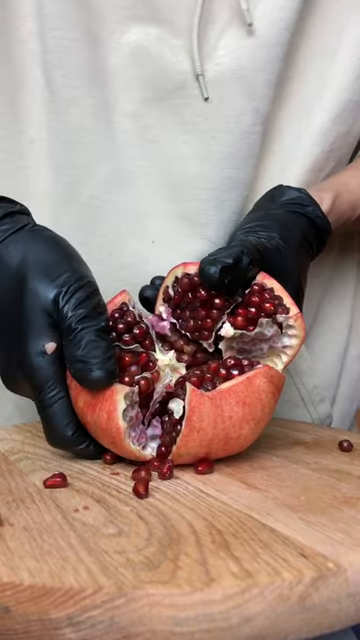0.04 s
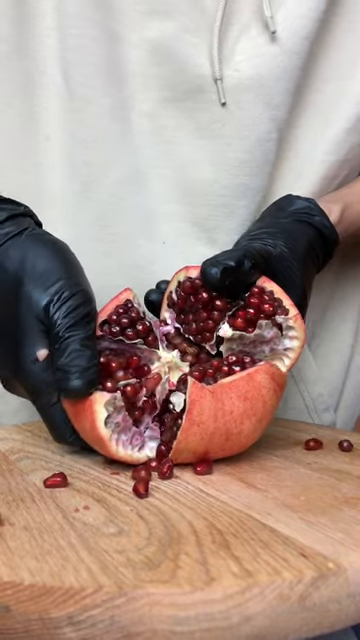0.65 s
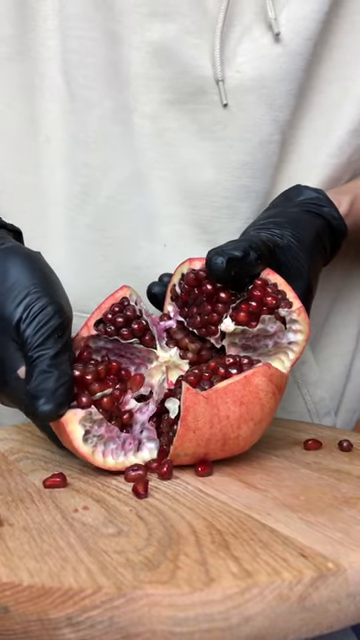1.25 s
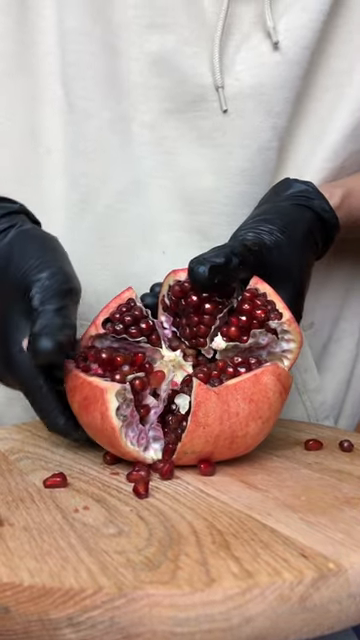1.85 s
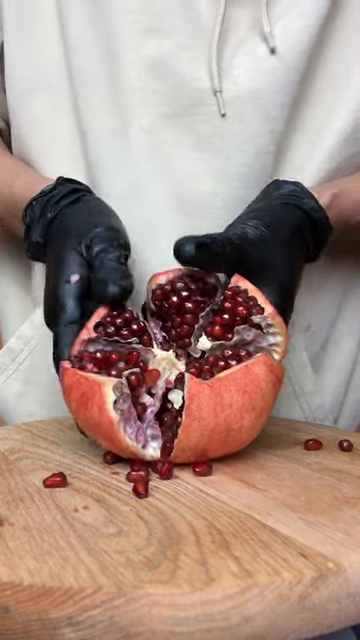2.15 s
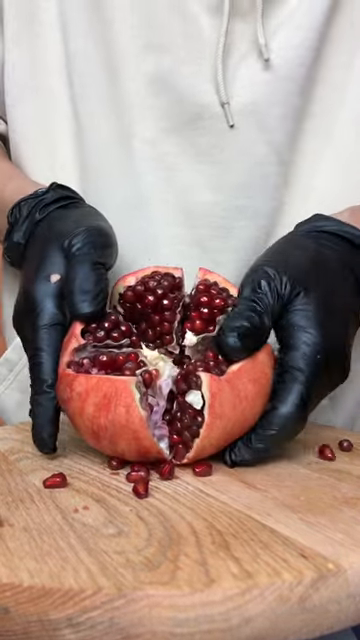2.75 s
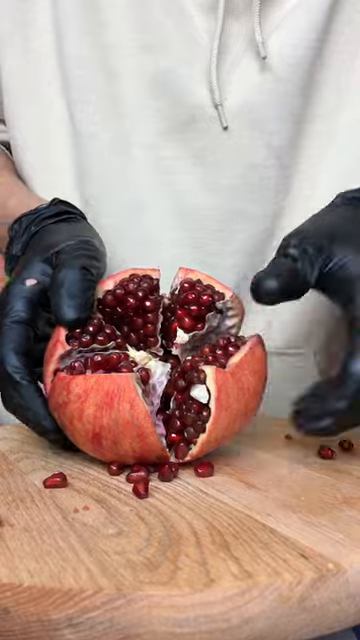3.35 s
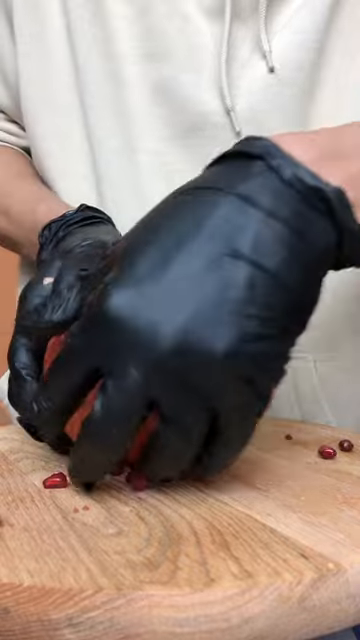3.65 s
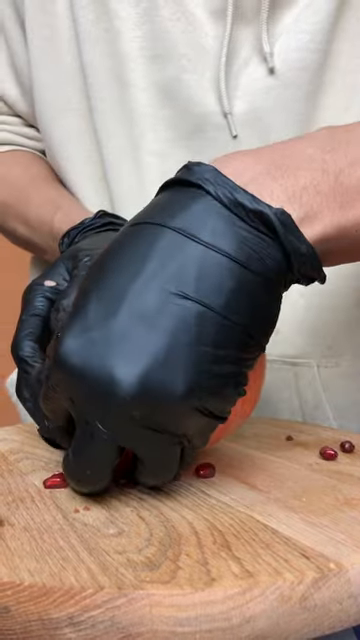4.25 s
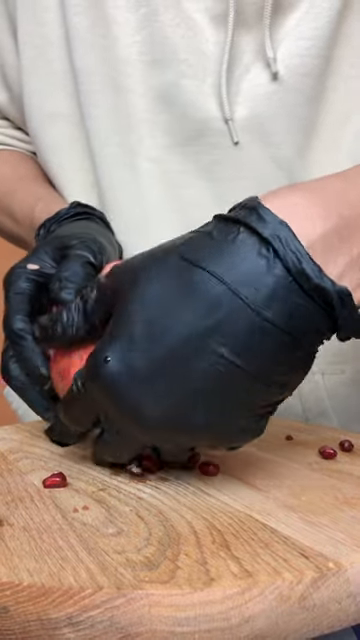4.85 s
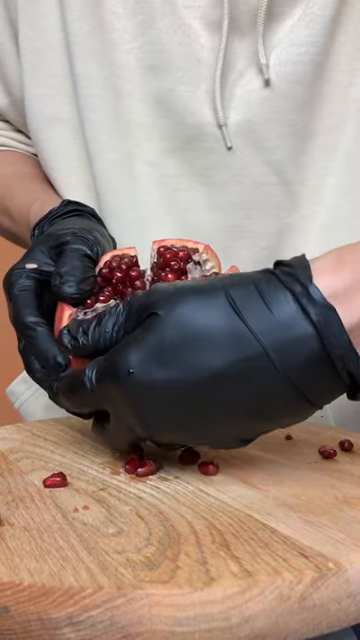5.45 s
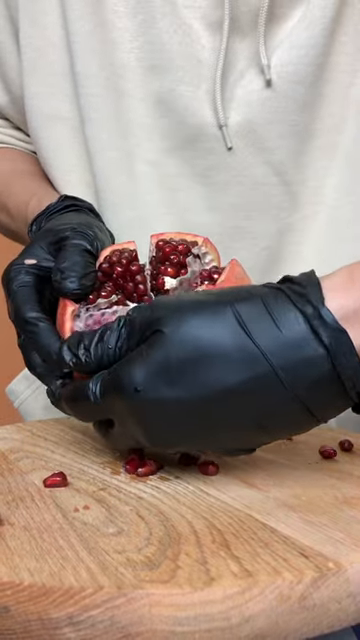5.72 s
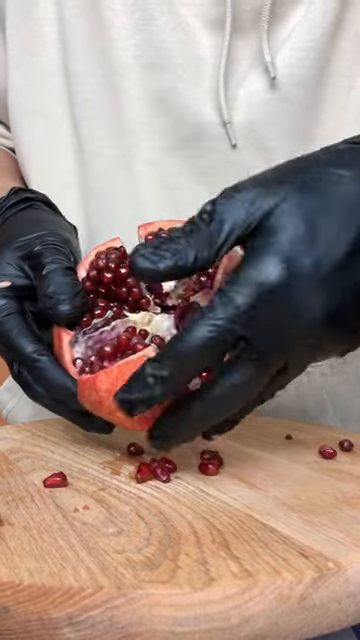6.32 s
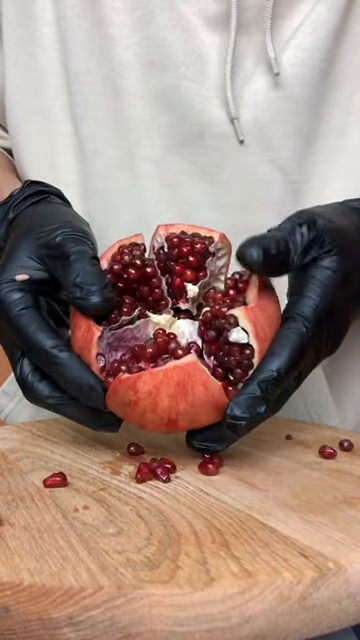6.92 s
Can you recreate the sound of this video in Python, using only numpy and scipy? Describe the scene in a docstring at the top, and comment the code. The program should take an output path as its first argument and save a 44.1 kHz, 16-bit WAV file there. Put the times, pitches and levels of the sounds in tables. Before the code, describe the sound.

Gloved hands pull a pomegranate apart on a wooden board, close to the microphone. A few small snaps and seed taps lead into one loud burst of cracking rind, followed by faint wet crackles. Rubber gloves rub and squeak on the skin, a second, softer stretch of tearing crackles through the pith, and the gloves rasp and squeak again. A small room hums quietly behind.

```python
"""Pulling a pomegranate open

Close up, gloved hands pull a scored pomegranate apart on a wooden board. The rind gives way in one
loud burst of snaps, pith and wet seeds crackle, and loose seeds tap the board. The rubber gloves
stick and slip on the skin, rubbing, rasping and squeaking. Behind it a small room hums and rumbles."""
import sys
import numpy as np
from scipy import signal
from scipy.fft import rfft, irfft
from scipy.io import wavfile

SR = 44100
rng = np.random.default_rng(int(sys.argv[2]) if len(sys.argv) > 2 else 0)


def output_pcm(signal):
    """Save a mono or channel-first signal as 16-bit PCM at the path in sys.argv[1].

    Samples are clipped to [-1, 1] before scaling.
    """
    pcm = np.clip(np.atleast_2d(signal).T, -1, 1) * 32767
    wavfile.write(sys.argv[1], SR, np.round(pcm).astype(np.int16))


N = 312228
TIME = np.arange(N) / SR

# tone colour of wet pith: (frequency [Hz], level [dB])
PITH_SPECTRUM = [(300, -24), (700, -6.5), (1150, -7.5), (1500, 1), (2000, -4.5), (2500, -0.5), (3800, -9),
                 (5000, -7.5), (7300, -7.5), (9300, -10), (10700, -13.5), (13500, -11), (16000, -28)]
# loose seeds landing on the board: (time [s], level [dB], ring pitch [Hz])
SEED_DROPS = [(0.212, -22, 990), (0.247, -10, 1100), (0.349, -21.5, 915), (0.413, -18.5, 1560),
              (1.494, -21, 680), (1.577, -33, 714)]


def from_db(db):
    """Decibels to gain."""
    return 10 ** (np.asarray(db) / 20)


def rms_one(x):
    """Scale to unit rms."""
    return x / np.sqrt(np.mean(x ** 2) + 1e-20)


def in_time(rows):
    """Each column of an automation curve at every sample."""
    s, *columns = np.transpose(rows)
    return [np.interp(TIME, s, c) for c in columns]


def at_hz(points, hz):
    """Read a table on a log-frequency axis."""
    f, value = np.transpose(points)
    return np.interp(np.log(np.maximum(hz, 1)), np.log(f), value)


def cut(x, hz, kind, order=2):
    """Butterworth filter."""
    sos = signal.butter(order, np.clip(hz, 5, .48 * SR), kind, fs=SR, output="sos")
    return signal.sosfilt(sos, x + 1e-18)


def coloured(x, spectrum):
    """Shape a signal with an EQ curve; rms 1."""
    gains = from_db(at_hz(spectrum, np.arange(N // 2 + 1) * SR / N))
    return rms_one(irfft(rfft(x) * gains, N))


def drift(per_s):
    """Random modulation gliding to per_s new values a second; rms 1."""
    knots = rng.standard_normal(int(N / SR * 2000))
    return rms_one(np.interp(TIME * per_s, np.arange(len(knots)), knots))


def ring(x, hz, t60):
    """A resonator: a unit click starts a sine of height 1 that falls 60 dB in t60 seconds."""
    r = from_db(-60 / (max(t60, 1e-4) * SR))
    w = 2 * np.pi * min(hz, .45 * SR) / SR
    return signal.lfilter([0, np.sin(w)], [1, -2 * r * np.cos(w), r * r], x + 1e-18)


def grains(per_s, spread_db, cycles):
    """Tiny ruptures of uneven size, each ringing a few cycles at one of 16 pitches; rms 1."""
    sizes = from_db(spread_db * np.minimum(rng.exponential(1, N), 4)) * rng.choice([-1, 1], N)
    clicks = sizes * (rng.random(N) < per_s / SR)
    pitches = np.geomspace(700, 15000, 16)
    dealt = rng.integers(0, len(pitches), N)
    return rms_one(sum(ring(clicks * (dealt == k), hz, cycles / hz) * hz for k, hz in enumerate(pitches)))


def gate(start, length, attack_s, release_s):
    """Envelope that is fully open at start, holds, then dies away."""
    attack = np.clip((TIME - start) / attack_s + 1, 0, 1)
    return attack * np.exp(-np.clip((TIME - start - length) / release_s, 0, 30))


def stroked(texture, strokes, shape, body_hz, sheen_hz):
    """Play the body, middle and sheen of a texture along each stroke of the hands."""
    bands = (cut(texture, body_hz, "low", order=4),
             cut(texture, [body_hz, sheen_hz], "band", order=4),
             cut(texture, sheen_hz, "high", order=4))
    rows = np.array(strokes)
    envelopes = np.array([shape(*timing) for timing in rows[:, :-len(bands)]])
    powers = from_db(rows[:, -len(bands):]).T ** 2 @ envelopes ** 2
    return sum(rms_one(band) * np.sqrt(power) for band, power in zip(bands, powers))


def hum(curve, hz, gain_db, waver_hz, flutter_db, third=0):
    """A tone that wavers in pitch and level, with an optional third harmonic."""
    phase = 2 * np.pi * np.cumsum(hz + waver_hz * drift(15)) / SR
    level = from_db(in_time(curve)[0] + gain_db + flutter_db * drift(9))
    return np.sqrt(2) * level * (np.sin(phase) + third * np.sin(3 * phase))


def room_tone():
    """Two wavering hums over a dull, resonant rumble and a faint hiss."""
    # tone colours: (frequency [Hz], level [dB])
    air_spectrum = [(300, 16), (600, 12.5), (1100, 9.5), (1500, 6), (2500, 13.5), (3200, 3), (8000, 7),
                    (10500, -42), (14000, -30), (16000, -6)]
    rumble_spectrum = [(30, -2.5), (58, 3), (74, -16), (93, 7.5), (135, -0.5), (185, 2), (240, -5.5),
                       (340, -17.5), (440, -16), (600, -17.5), (1000, -27)]
    # fader moves: (time [s], level [dB])
    low_hum_fader = [(0.0, -33.5), (0.37, -26.5), (0.67, -29.5), (0.69, -40), (1.1, -37), (1.3, -27.5),
                     (1.58, -25.5), (1.77, -41.5), (1.81, -33.5), (2.33, -24.5), (2.8, -32.5),
                     (3.06, -24.5), (3.19, -34.5), (4.0, -31), (4.08, -50), (4.14, -38.5), (4.77, -32.5),
                     (5.68, -43), (6.98, -47.5), (7.08, -65)]
    upper_hum_fader = [(0.0, -66), (0.69, -49.5), (3.63, -38), (3.69, -46.5), (5.21, -46.5), (5.24, -38.5),
                       (5.86, -49.5), (6.17, -32), (7.08, -36.5)]
    rumble_fader = [(0.0, -43.5), (1.3, -43), (3.2, -37), (3.6, -40), (5.6, -46), (7.08, -44.5)]
    # resonances standing out of the rumble: (frequency [Hz], level [dB], t60 [s])
    room_modes = [(88, -21, 0.23), (179, -8.5, 0.33), (195.8, -7, 1), (225.2, -8, 0.49), (288.2, -14, 0.12),
                  (340.7, -15.5, 0.41)]
    hiss = from_db(-50) * coloured(rng.standard_normal(N), air_spectrum)
    low_hum = hum(low_hum_fader, hz=113.5, gain_db=-0.6, waver_hz=0.81, flutter_db=1.77)
    upper_hum = hum(upper_hum_fader, hz=160.5, gain_db=-0.4, waver_hz=1.73, flutter_db=1.6,
                    third=from_db(-27))
    white = rng.standard_normal((2, N))
    boom = sum(from_db(db) * rms_one(ring(white[0], hz, t60)) for hz, db, t60 in room_modes)
    rumble = from_db(3.0) * coloured(white[1], rumble_spectrum) + from_db(1.5) * boom
    return hiss + low_hum + upper_hum + from_db(in_time(rumble_fader)[0]) * rumble


def table_sway():
    """The table shakes slowly under the hands: a sub-bass wobble."""
    # weight of the wobble: (frequency [Hz], level [dB])
    sway_spectrum = [(8, -12), (14, 0), (22, -6), (32, -14), (45, -24), (80, -50), (200, -100)]
    # how hard the table shakes: (time [s], level [dB])
    shake = [(0.0, -23.5), (0.45, -34.5), (0.67, -22), (1.05, -39), (1.54, -29.5), (2.0, -29), (2.15, -41),
             (3.3, -30.5), (4.14, -44), (4.6, -25), (4.95, -27), (5.3, -41), (7.08, -56)]
    return coloured(rng.standard_normal(N), sway_spectrum) * from_db(in_time(shake)[0])


def tear_shape(start, length, sag_db=2.5):
    """A tear is strongest as it gives way, then slackens."""
    tension = np.interp(TIME, [start, start + length], [1, from_db(-sag_db)])
    return gate(start, length, attack_s=0.002, release_s=0.015) * tension


def pith():
    """Cell walls burst in clumps over a fine wet fizz; now and then a thicker one ticks."""
    # pulls that tear pith and squash seeds:
    # (start [s], length [s], wet body [dB], crackle [dB], sheen [dB])
    tears = [(0.005, 0.078, -36.5, -45, -41), (0.494, 0.0083, -34, -31, -40),
             (0.5495, 0.012, -11, -12.5, -22), (0.565, .04, -25, -30, -34), (0.612, 0.035, -27, -28, -30),
             (0.673, 0.048, -33, -35.5, -56), (0.876, 0.19, -49, -58, -49), (1.14, 0.055, -41, -41, -38),
             (1.215, 0.075, -44, -44, -44), (1.308, 0.075, -39.5, -38, -39), (1.438, 0.02, -40, -41, -44),
             (1.792, 0.078, -42.5, -43.5, -47), (4.037, 0.39, -38.5, -40.5, -47),
             (4.175, 0.042, -30, -30.5, -36), (4.241, 0.12, -31.5, -29.5, -38),
             (4.37, 0.06, -33.5, -30, -36.5), (4.452, 0.024, -39, -26, -35), (4.493, 0.12, -43.5, -33, -40),
             (4.62, 0.36, -47, -43.5, -47), (5.173, 0.05, -41, -39, -43.5), (5.244, 0.06, -49, -46, -49),
             (5.367, 0.0071, -50, -42, -41), (5.422, 0.013, -37.5, -38.5, -40.5)]
    crackle = grains(per_s=2800, spread_db=1.0, cycles=8.2)
    fizz = from_db(-2.5) * rng.standard_normal(N)
    clumps = coloured(crackle + fizz, PITH_SPECTRUM) * from_db(1.9 * drift(130))
    ticks = coloured(rng.standard_normal(N) * (rng.random(N) < 110 / SR), PITH_SPECTRUM)
    texture = clumps + from_db(-14.5) * ticks
    return from_db(-3.5) * stroked(texture, tears, tear_shape, body_hz=3460, sheen_hz=8440)


def juice(ticks_per_s=32):
    """Sticky seeds and small fibres tick faintly while the fruit is being spread."""
    # the hands spread the fruit: (start [s], end [s])
    spreads = [(0, 1.9), (3.5, 5.35)]
    spreading = sum((TIME > start) & (TIME < end) for start, end in spreads)
    sizes = from_db(2.9 * np.minimum(rng.exponential(1, N), 3)) * rng.choice([-1, 1], N)
    ticks = sizes * (rng.random(N) < ticks_per_s / SR)
    return from_db(-50.5) * spreading * coloured(ticks, PITH_SPECTRUM)


def fractures(events, edge_s, edge_hz, crumble_db, crumble_s):
    """Each fracture is a sharp edge and a damped ring of the broken piece, trailed by fine crumbling."""
    out, t = np.zeros(N + SR), np.arange(SR // 25) / SR
    for s, db, hz, edge_db, cycles in events:
        tear, crumbs = rng.standard_normal((2, len(t)))
        body = ring(1. * (t == 0), hz, cycles / hz)
        edge = cut(tear * np.exp(-t / edge_s), edge_hz, "high")
        edge = cut(edge, 7600, "low", order=1)
        snap = cut(body + from_db(edge_db) * edge / np.abs(edge).max(), hz * 0.37, "high")
        # hands, peel and board scatter a weak copy of the snap
        scatter = crumbs * np.abs(crumbs) * np.exp(-t / crumble_s) * (t > 1 / 1000)
        crumble = signal.fftconvolve(snap, scatter / np.linalg.norm(scatter))[:len(t)]
        snap = snap + from_db(crumble_db) * crumble
        at = int(s * SR)
        out[at:at + len(t)] += from_db(db) * snap / np.abs(snap).max()
    return out[:N]


def hollow(x, hz, width_hz, depth):
    """Scoop a dip out of the spectrum; depth 1 is a full notch."""
    notched = signal.lfilter(*signal.iirnotch(hz, hz / width_hz, fs=SR), x + 1e-18)
    return x + depth * (notched - x)


def rind_and_seeds():
    """The big break, lone snaps and dropping seeds, hollowed by their reflection from the board."""
    # the rind breaks through: (time [s], level [dB], ring pitch [Hz], edge [dB], ring length [cycles])
    rind_break = [(0.498, -2.5, 1520, -8, 5.6), (0.5478, 8, 1400, 7, 7.8), (0.5497, 1.5, 1004, -16, 11),
                  (0.5553, 10.5, 1590, -27, 9.8), (0.566, -2, 1820, 17, 8), (0.5757, -8, 2400, -13, 12),
                  (0.5853, -2, 1350, 22, 4.6), (0.599, 4, 1500, 23, 9.6), (0.6018, 9, 7000, -17, 11),
                  (0.6084, 6.5, 3930, 10, 8), (0.6123, 8.5, 1660, 1, 8.8), (0.6158, 9, 2660, 15, 11),
                  (0.6403, -2, 1490, 2, 5.1), (0.6528, 10.5, 2530, -1.5, 7.4)]
    # single fibres snap: (time [s], level [dB], ring pitch [Hz])
    fibre_snaps = [(0.017, -13, 1490), (0.065, -2, 2200), (0.12, -3, 2700), (0.313, 0, 11700),
                   (0.46, -11.5, 5600), (0.467, -8.5, 6300), (0.834, -21.5, 2320), (0.877, -12, 3480),
                   (0.882, -12, 2560), (0.908, -11.5, 7100), (0.938, -11.5, 3830), (0.966, -15, 2620),
                   (1.04, -17, 1420), (1.059, -13.5, 2500), (1.137, -16.5, 1420), (1.151, -5.5, 4660),
                   (1.211, -12, 7600), (1.341, -7.5, 2240), (1.42, -6.5, 1410), (1.474, -5.5, 5450),
                   (1.851, -19.5, 950), (1.883, -16, 2540), (2.019, -23, 950), (2.031, -14, 3930),
                   (2.189, -18, 5970), (2.261, -15, 1970), (2.361, -6, 10100), (2.847, -12, 1710),
                   (2.897, -15.5, 1770), (2.946, -8, 2600), (3.02, -12, 6650), (3.03, -7.5, 2750),
                   (3.711, -18.5, 5940), (3.755, -16, 3720), (4.038, -11, 2550), (4.178, -11, 2630),
                   (4.19, -2, 5940), (4.236, -3.5, 6650), (4.254, -4, 6340), (4.264, -0.5, 5570),
                   (4.314, 1.5, 4220), (4.325, -9.5, 1550), (4.384, -14, 4260), (4.46, -7, 4850),
                   (4.654, -14, 7370), (5.014, -14, 2900), (5.119, -16, 2500), (5.178, -12, 4570),
                   (5.22, -14, 1620), (5.289, -16, 2310), (5.419, -25, 1630), (5.608, -18.5, 1480),
                   (5.632, -14, 2760), (5.724, -9.5, 2690), (5.775, -27, 2600), (5.823, -17.5, 1940),
                   (6.308, -13.5, 1680), (6.826, -22, 1490)]
    fibre_cycles, seed_cycles, seed_edge_db = 9.7, 3, -5.5
    burst = fractures(rind_break, edge_s=0.00081, edge_hz=1750, crumble_db=-15.5, crumble_s=0.005)
    # thick fibres tear with a sharp edge, thin ones just ping: 9.5 dB less edge per octave above 2500 Hz
    fibres = [(s, db, hz, 6 - 9.5 * max(np.log2(hz / 2500), 0), fibre_cycles)
              for s, db, hz in fibre_snaps]
    seeds = [(s, db, hz, seed_edge_db, seed_cycles) for s, db, hz in SEED_DROPS]
    lone = fractures(fibres + seeds, edge_s=0.00036, edge_hz=3400, crumble_db=-9.0, crumble_s=0.0032)
    snaps = from_db(-0.5) * (burst + lone)
    snaps = hollow(snaps, hz=5080, width_hz=1950, depth=0.35)
    return hollow(snaps, hz=10700, width_hz=6300, depth=0.66)


def knocked_wood(hits):
    """The board rings in all its modes after each knock."""
    # resonances of board and table: (frequency [Hz], level [dB], t60 [s])
    wood_modes = [(24.7, -6, 0.68), (89.7, 0.5, 0.5), (104, -39, 0.17), (297, -26, 0.036), (520, -11, 0.1),
                  (818, 3, 0.04), (949, -8.5, 0.2)]
    knocks = np.zeros(N)
    for s, db, *_ in hits:
        knocks[int(s * SR)] = from_db(db)
    return sum(from_db(db) * ring(knocks, hz, t60) for hz, db, t60 in wood_modes)


def board():
    """The fruit jolts the board; light seeds wake only its upper modes."""
    # jolts as rind and core let go: (time [s], level [dB])
    thumps = [(0.549, -18), (0.612, -17), (4.191, -33.5), (4.27, -33.5)]
    taps = from_db(-19) * cut(knocked_wood(SEED_DROPS), 840, "high", order=4)
    return knocked_wood(thumps) + taps


def rub_shape(start, length, crest, swell_db=3.5):
    """A stroke presses harder up to its crest, then eases."""
    ends = from_db(-swell_db)
    pressure = np.interp(TIME, start + length * np.array([0, crest, 1]), [ends, 1, ends])
    return gate(start, length, attack_s=0.011, release_s=0.0077) * pressure


def glove_rubs():
    """Rubber sticks and slips very fast on the skin of the fruit."""
    # strokes: (start [s], length [s], crest [share of length], body [dB], hiss [dB], sheen [dB])
    rubs = [(2.191, 0.018, .3, -55, -37, -43), (2.242, 0.11, 1, -43.5, -43, -45),
            (2.374, 0.2, 0.78, -42, -35, -39), (2.412, 0.069, 0.21, -47, -29, -27.5),
            (2.669, 0.085, .25, -40.5, -32, -37), (2.767, 0.067, 0.34, -40, -38.5, -46),
            (2.84, 0.4, 0.31, -46, -43, -49), (3.183, 0.15, 0.72, -41.5, -34, -39),
            (3.332, 0.15, .1, -53, -48, -46), (3.535, 0.023, .5, -56, -43, -56),
            (3.602, 0.056, 0.7, -46.5, -41, -45), (3.714, 0.074, 0.65, -49, -41, -49),
            (3.819, .1, 1, -52, -41, -46), (4.8, 0.223, 0.48, -42.5, -31, -39.5),
            (4.908, 0.056, .4, -51, -27.5, -29.5), (5.057, 0.026, 0.44, -50, -38, -36),
            (5.931, 0.17, 0.98, -49, -42, -48), (6.115, 0.018, 0.12, -33, -26, -33),
            (6.141, 0.073, 1, -41, -29.5, -33.5), (6.223, 0.594, .4, -47.5, -43.5, -46),
            (6.85, 0.1, 0.86, -54.5, -47, -51), (6.393, 0.078, .6, -47, -38.5, -46),
            (6.706, .09, 0.59, -51, -40.5, -58)]
    # tone colour of sliding rubber: (frequency [Hz], level [dB])
    rubber_spectrum = [(400, -4), (1100, -1), (1550, 5.5), (2400, 5), (3100, -5), (4000, -4.5),
                       (5500, -3.5), (8500, -5), (10600, -6.5), (12700, -3), (16000, -9.5)]
    slips = grains(per_s=8200, spread_db=-2, cycles=4.9) + from_db(-5) * rng.standard_normal(N)
    friction = coloured(slips, rubber_spectrum) * from_db(1.1 * drift(170))
    return from_db(-0.86) * stroked(friction, rubs, rub_shape, body_hz=3100, sheen_hz=8740)


def glove_rasps(slips_per_s=5000, fade_s=0.0024):
    """Uneven slips drive one broad resonance of the stretched glove."""
    # taut rubber skids: (start [s], end [s], centre [Hz], width [Hz], level [dB])
    rasps = [(2.242, 2.356, 2380, 600, -45.5), (2.404, 2.45, 4070, 900, -32),
             (4.814, 4.954, 4450, 2200, -35), (6.111, 6.219, 4100, 2740, -30)]
    out = np.zeros(N)
    for start, end, hz, width_hz, db in rasps:
        t = np.arange(int((end - start) * SR)) / SR
        slips = rng.standard_normal(len(t)) * (rng.random(len(t)) < slips_per_s / SR)
        edges = hz * (1 + width_hz / hz) ** np.array([-.5, .5])
        grip = np.clip(np.minimum(t, t[-1] - t) / fade_s, 0, 1)
        at = int(start * SR)
        out[at:at + len(t)] += from_db(db) * grip * rms_one(cut(slips, edges, "band"))
    return out


def glove_squeaks(jitter=.007, flutter_db=4.5, fade_s=.02):
    """Wet rubber squeaks: thin, trembling, inharmonic partials rise and fall with the hand's speed."""
    # one curve per glide: (time [s], pitch [Hz], level [dB])
    glides = [
        [(2.77, 5000, -54), (2.84, 6470, -47), (2.91, 7050, -39), (3.0, 7370, -37), (3.13, 7400, -36),
         (3.2, 7030, -38), (3.31, 5130, -58), (3.44, 3630, -57)],
        [(6.24, 5650, -45), (6.34, 6720, -39), (6.45, 7080, -40), (6.55, 6430, -40.5), (6.65, 6200, -40),
         (6.72, 6030, -42), (6.83, 5620, -46), (6.9, 5600, -47), (6.98, 4540, -47)],
    ]
    # one set of partials per glide: (frequency [multiple of the pitch], level [dB])
    partial_sets = [
        [(1, -13.5), (1.2, -13.5), (1.45, -18), (1.66, -13), (1.73, -16), (1.77, -4), (2.06, -23), (3.15, -1)],
        [(1, -9), (1.66, -10), (1.82, -13.5), (2.03, -13), (2.25, -13), (2.48, -9), (2.75, -10)],
    ]
    out = np.zeros(N)
    for glide, partials in zip(glides, partial_sets):
        start, end = glide[0][0], glide[-1][0]
        on = (TIME > start) & (TIME < end)
        hz, db = (column[on] for column in in_time(glide))
        touch = np.clip(np.minimum(TIME[on] - start, end - TIME[on]) / fade_s, 0, 1)
        for multiple, partial_db in partials:
            pitch = multiple * hz * (1 + jitter * drift(600)[on])
            level = touch * from_db(db + partial_db + flutter_db * drift(25)[on]) * (pitch < SR / 2)
            out[on] += level * np.sqrt(2) * np.sin(2 * np.pi * np.cumsum(pitch) / SR)
    return out


def room_reverb(x, onset_s=0.00067):
    """The small room's diffuse tail, which dies sooner in the treble than in the bass."""
    # reverb time: (frequency [Hz], t60 [s])
    decay = [(200, 0.86), (1500, 0.19), (5000, 0.16), (16000, 0.21)]
    t, edges = np.arange(SR * 3 // 4) / SR, np.geomspace(125, 16000, 8)
    tail = np.zeros(len(t))
    for low, high in zip(edges, edges[1:]):
        t60 = at_hz(decay, np.sqrt(low * high))
        tail += cut(rng.standard_normal(len(t)), [low, high], "band") * from_db(-60 * t / t60)
    tail *= np.clip(t / onset_s, 0, 1)
    return signal.fftconvolve(x, tail / np.linalg.norm(tail))[:N]


def scene():
    """Mono mix: fruit and gloves up front with a little reverb, wood below, room tone behind."""
    close = rind_and_seeds() + pith() + glove_rubs() + glove_rasps() + glove_squeaks() + juice()
    return (close + from_db(-15) * room_reverb(close) + board() + table_sway() + room_tone())[None]


def record(dry):
    """The loudest snaps clip, then a steep low-pass cuts the top above 16 kHz."""
    low_pass = signal.ellip(12, .1, 80, 16000, fs=SR, output="sos")
    return signal.sosfilt(low_pass, np.clip(dry, -1, 1))


dry = scene()
out = record(dry)
output_pcm(out)
```